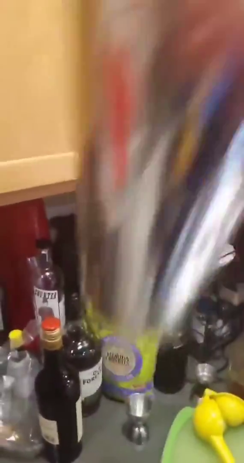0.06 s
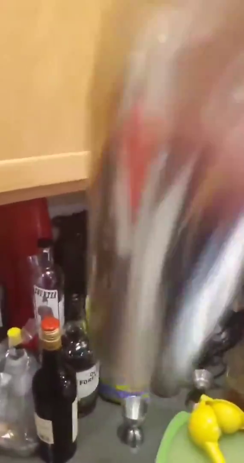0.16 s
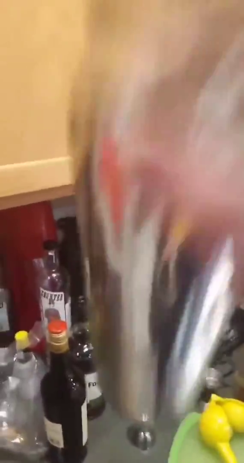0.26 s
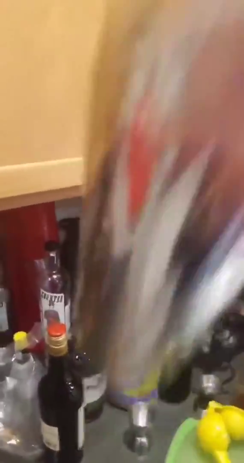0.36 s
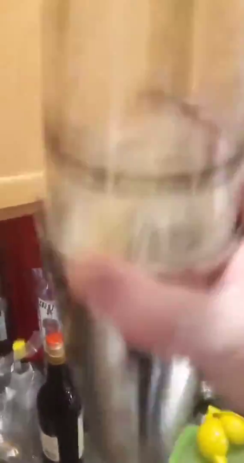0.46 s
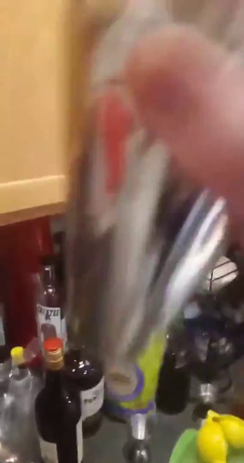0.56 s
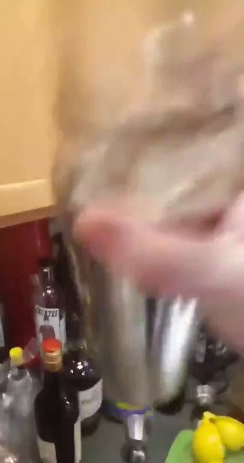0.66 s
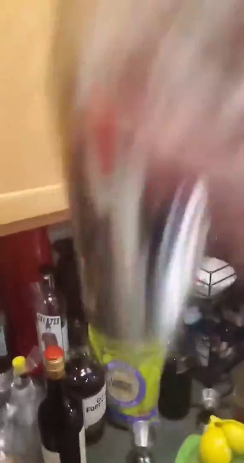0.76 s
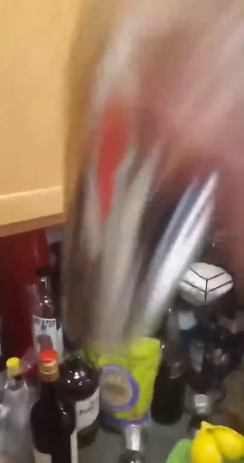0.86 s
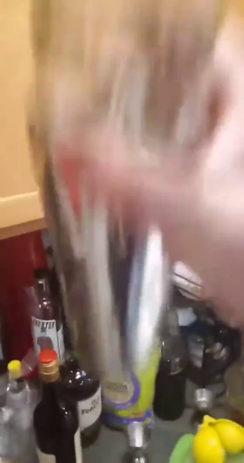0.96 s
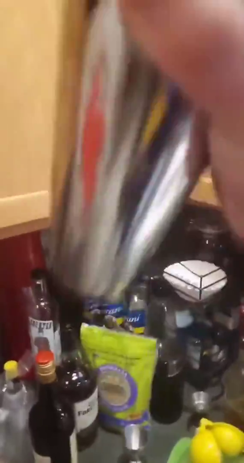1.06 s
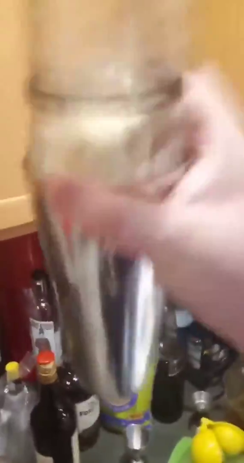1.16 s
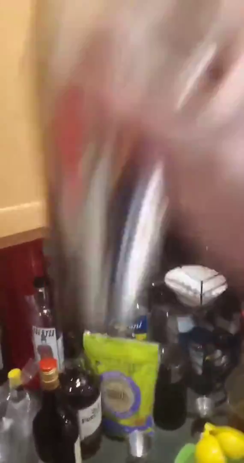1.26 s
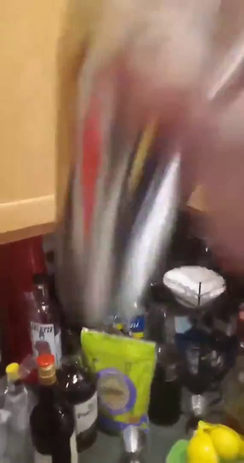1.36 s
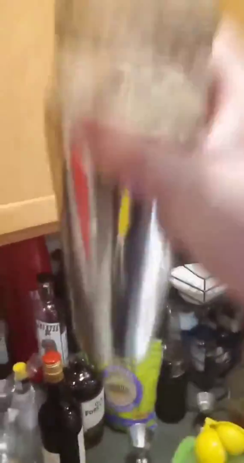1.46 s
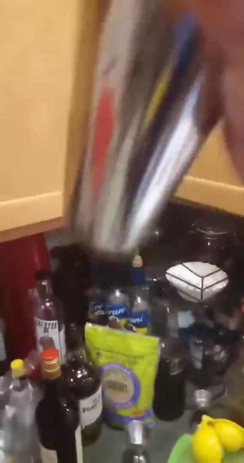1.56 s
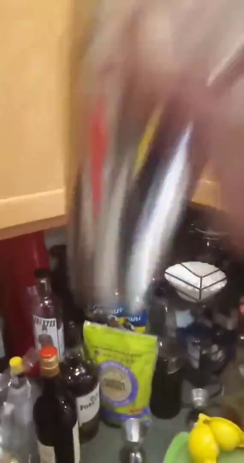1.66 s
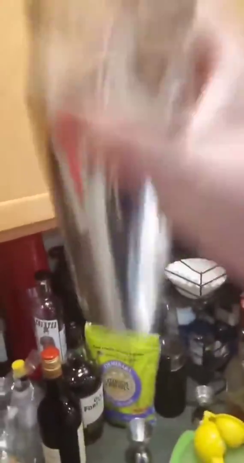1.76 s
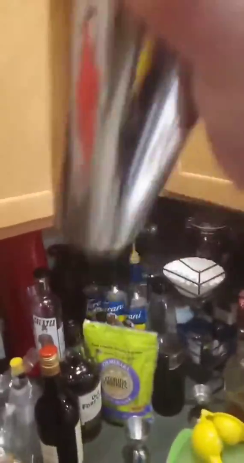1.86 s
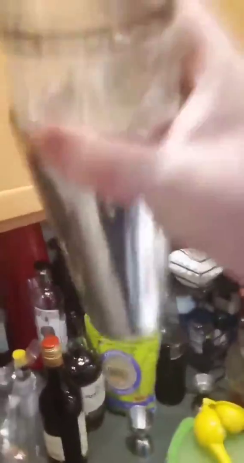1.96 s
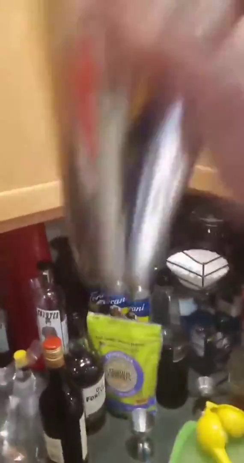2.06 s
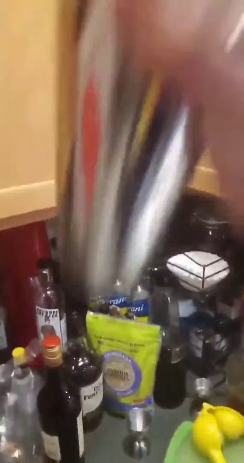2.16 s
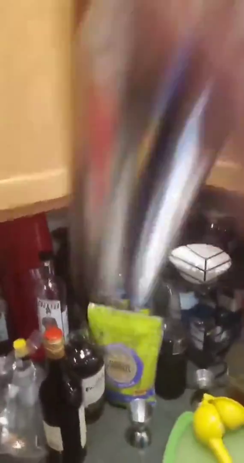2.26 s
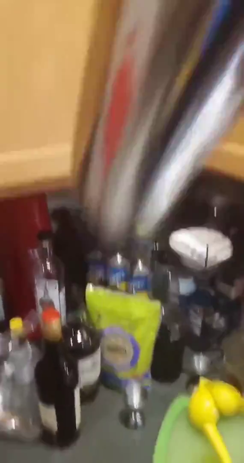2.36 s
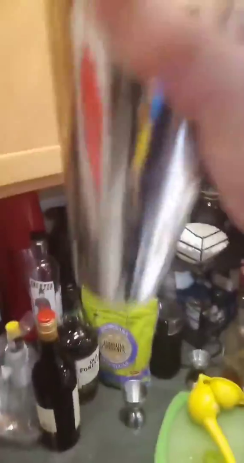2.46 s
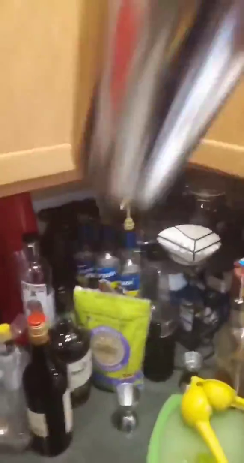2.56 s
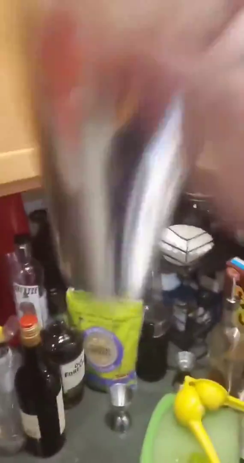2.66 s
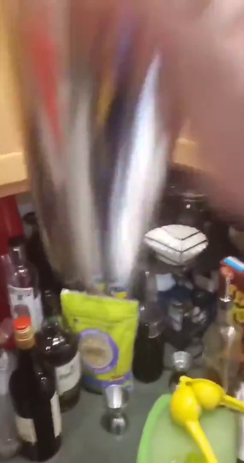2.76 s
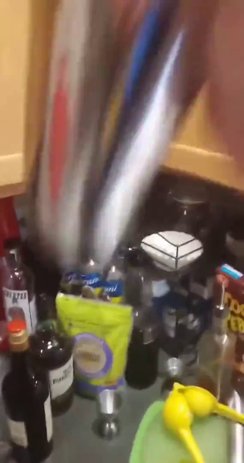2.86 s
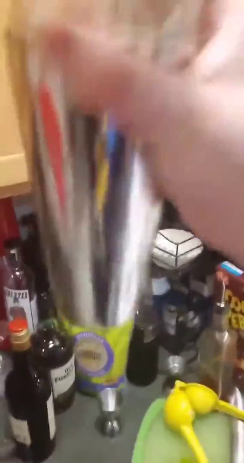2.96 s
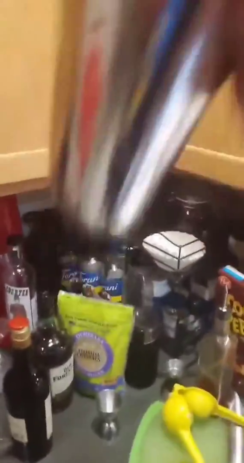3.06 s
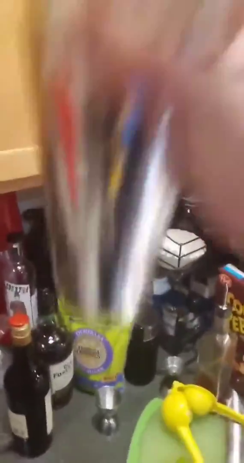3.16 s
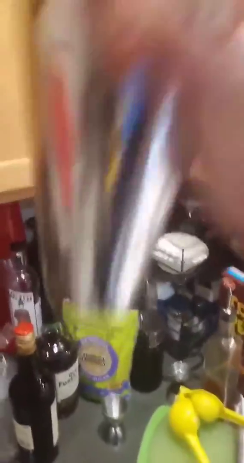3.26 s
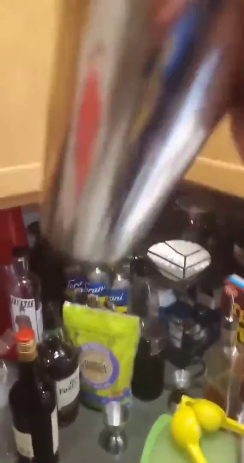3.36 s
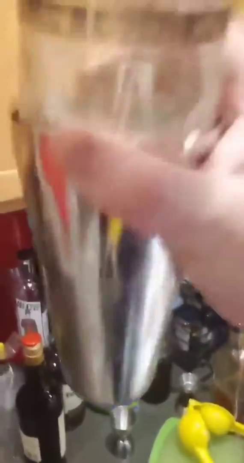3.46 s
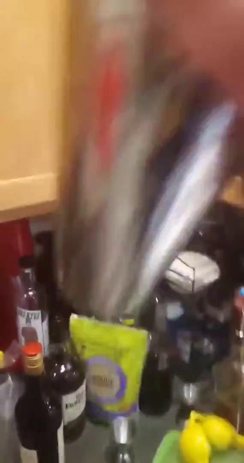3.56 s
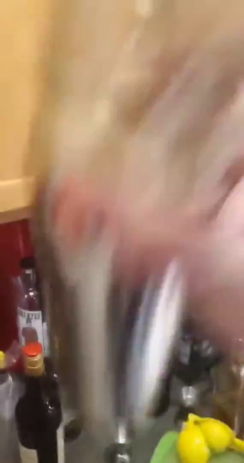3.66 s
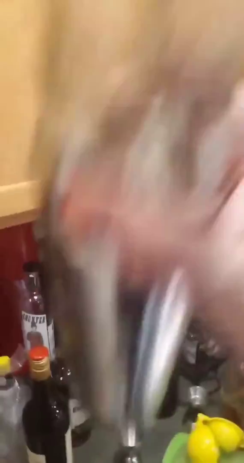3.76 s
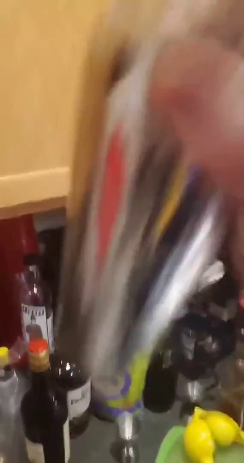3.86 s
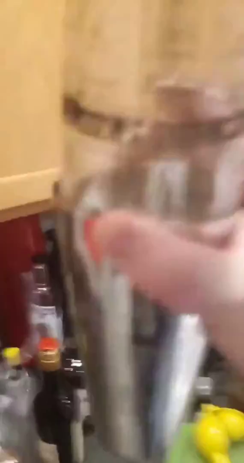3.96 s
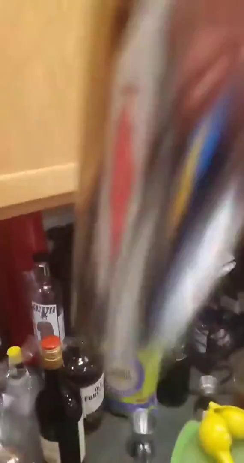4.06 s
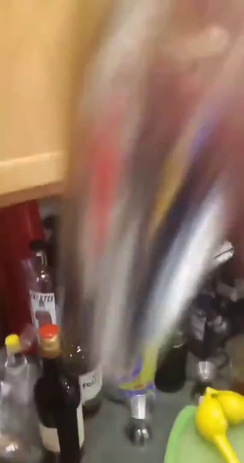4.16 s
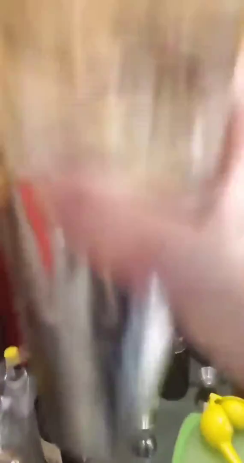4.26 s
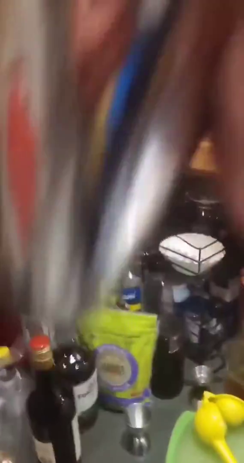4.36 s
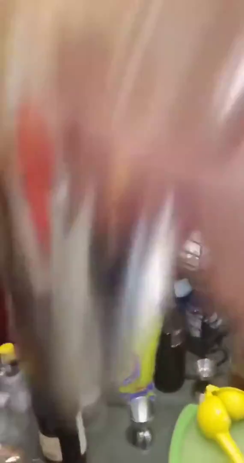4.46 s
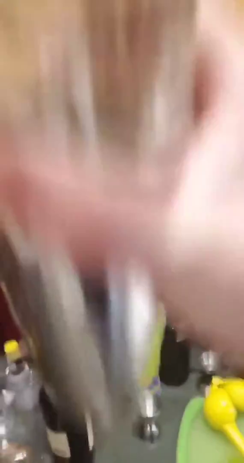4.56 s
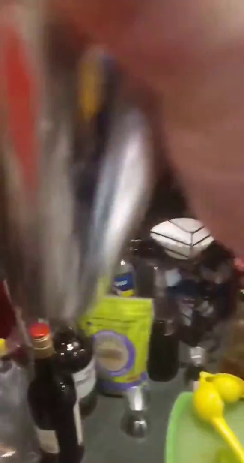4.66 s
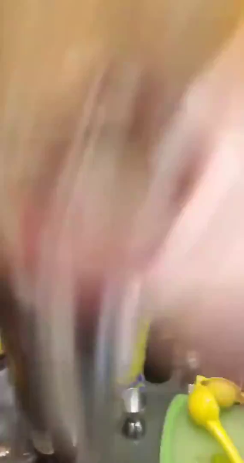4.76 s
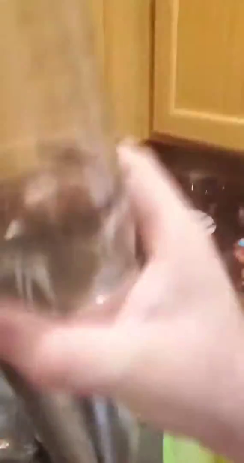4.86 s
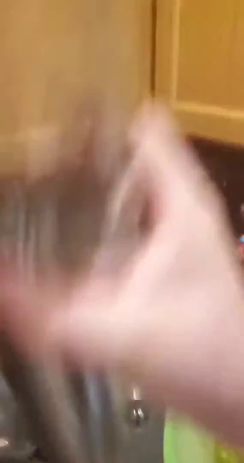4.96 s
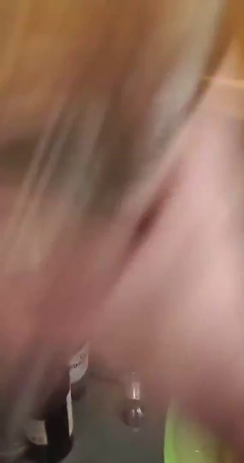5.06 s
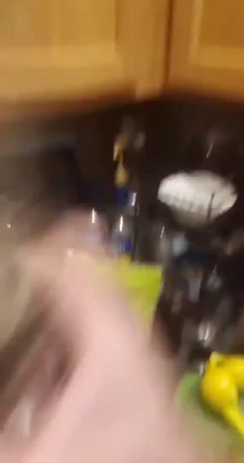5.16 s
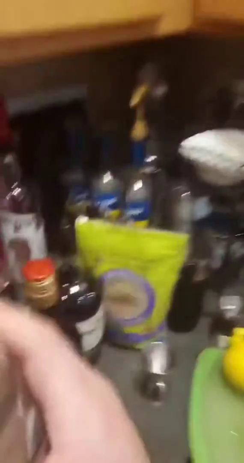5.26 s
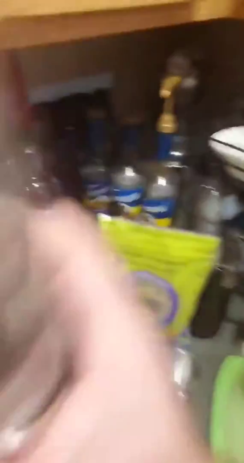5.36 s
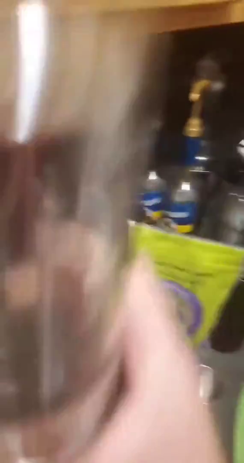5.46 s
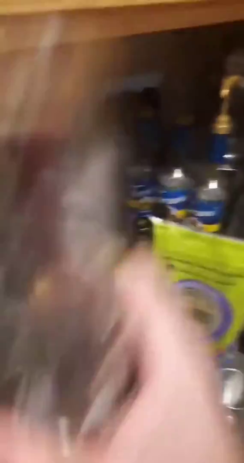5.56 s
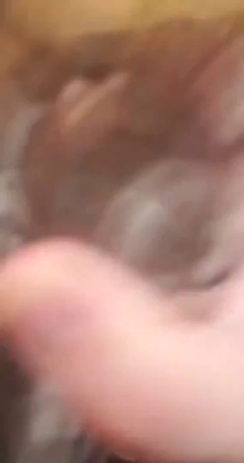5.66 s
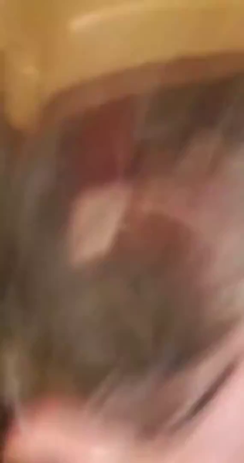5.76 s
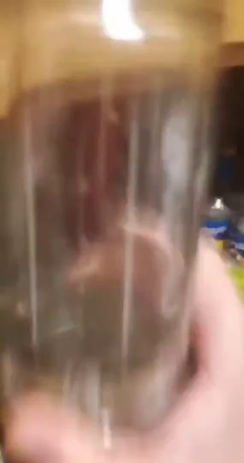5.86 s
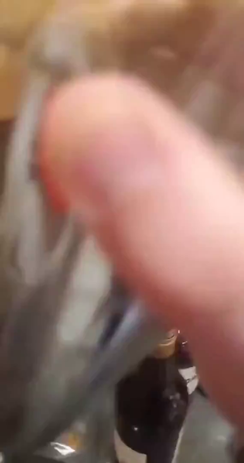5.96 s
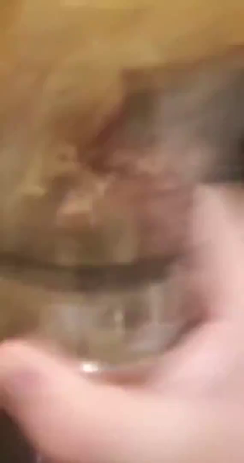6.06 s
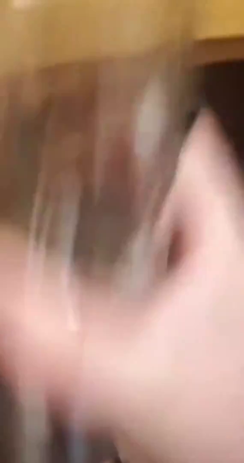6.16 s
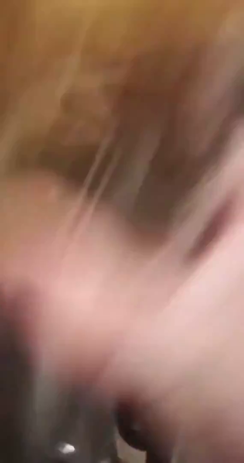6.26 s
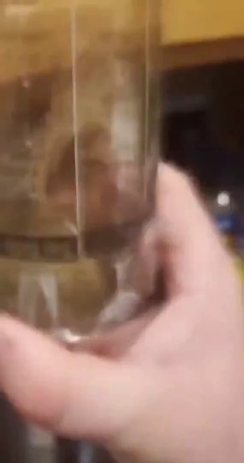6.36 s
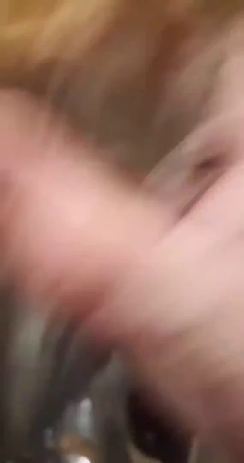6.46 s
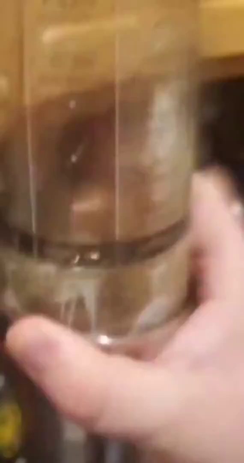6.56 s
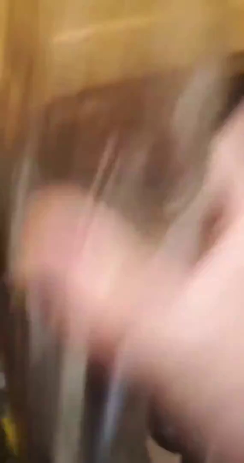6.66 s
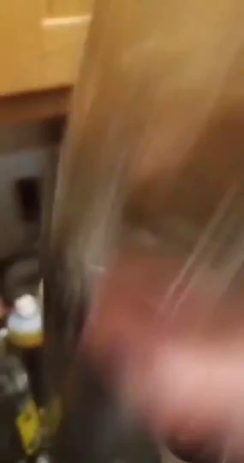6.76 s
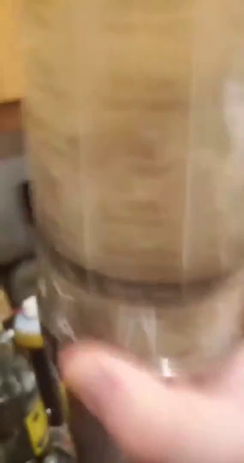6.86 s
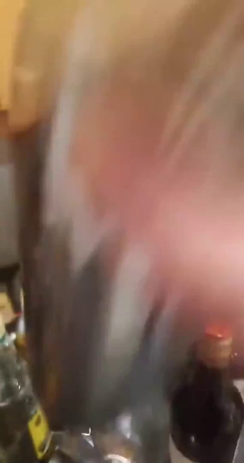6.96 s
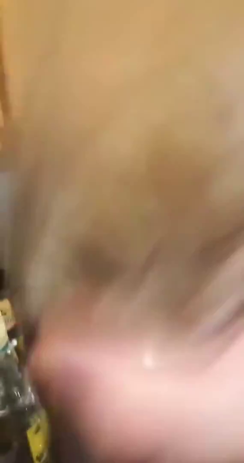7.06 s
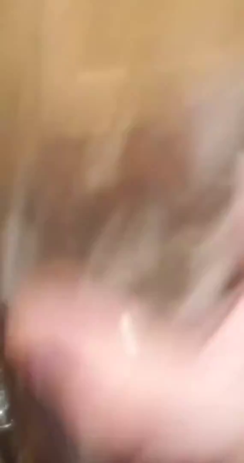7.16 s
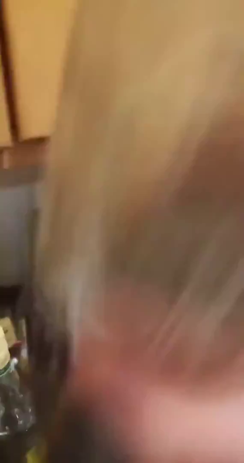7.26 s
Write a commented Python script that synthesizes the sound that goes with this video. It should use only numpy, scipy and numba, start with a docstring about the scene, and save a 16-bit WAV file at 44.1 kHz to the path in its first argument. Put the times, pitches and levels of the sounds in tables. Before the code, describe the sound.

Shaking is already under way at 0 s: ice and drink surge inside a steel tin capped with glass, held very close to a phone. Crashes come roughly every quarter second, each preceded by a short gritty slide and followed by a quickly fading trickle. Individual cubes strike between them with hard, dry clacks, mostly mid to high in pitch, some with a dull liquid thump. The gripped metal rings only briefly. Around 2.9 and 3.1 s the crashes are especially short and sharp. From about 4.9 to 5.7 s the surges weaken and spread apart, though single clacks continue; near 6 s the vigorous, even rhythm returns and lasts to the end at about 7.3 s. Tiny rising bubbles and brief wide hisses colour the rattle. The small kitchen adds a short tail over faint rumble and hum.

```python
"""Ice cubes clack singly against a steel tin capped with a glass, shaken hard close to a phone in a kitchen.
On each stroke the load of ice and drink slides, crashes into the end and trickles to rest.
Ice is sums of damped modes and filtered noise; the drink adds dull thumps and bubbles of rising pitch.
The gripped tin rings briefly, the small room adds a short tail, and a low rumble and hum lie beneath.
A wide hiss swells briefly whenever treble stands clear of the rattle."""
import sys
import numpy as np
from scipy import signal
from scipy.fft import rfft, irfft
from scipy.io import wavfile
from scipy.ndimage import uniform_filter1d
from numba import njit

SR = 44100
rng = np.random.default_rng(int(sys.argv[2]) if len(sys.argv) > 2 else 0)


def persist_wave(psi):
    """Save psi, clipped to +-1, as 16-bit WAV."""
    counts = np.round(np.clip(psi, -1, 1) * 32767).astype(np.int16)
    wavfile.write(sys.argv[1], SR, np.atleast_2d(counts).T)


N = 322371
T = np.arange(N) / SR
CONTROL_T = T[::32]  # coarser time grid for the slow levels

# Colour of a blow heard through the shaker wall. Each row: frequency in Hz, relative level in dB.
WALL_COLOUR = [(100, -14), (400, -11.5), (570, -11), (900, 0.5), (1500, 1.5), (1870, 7), (2350, 4),
               (4000, 1.5), (5500, -4.5), (7200, -5.5), (8200, -16.5), (10000, -12.5), (12000, -9.5),
               (13800, -17)]
# Colour of the load's dull push on the end. Each row: frequency in Hz, relative level in dB.
THUD_COLOUR = [(25, -32), (60, -2.5), (120, 2), (250, 1.5), (400, 8), (560, 1), (800, 8.5), (2500, -57)]
# Strokes of the arm. Each row: crash start in seconds, crash length in seconds, crash level in dB,
# length of the slide before it in seconds, slide level in dB, relative weight of the liquid in dB.
ARM_STROKES = [(0.148, 0.032, -19.5, 0.071, -30, -13.5), (0.398, 0.031, -18, .11, -34, -19),
               (0.612, 0.046, -20, 0.072, -33.5, -17), (0.842, 0.061, -19.5, 0.11, -32.5, -7.5),
               (1.108, 0.021, -19, 0.12, -31.5, -36), (1.338, 0.032, -19.5, 0.092, -28.5, -15),
               (1.607, 0.06, -21.5, 0.17, -33.5, -18), (1.872, 0.027, -19.5, .12, -31, -34),
               (2.11, 0.036, -17.5, 0.11, -36, -25), (2.357, 0.041, -20.5, 0.14, -33, -18.5),
               (2.608, 0.084, -19, 0.073, -30, -16), (2.884, 0.011, -14.5, 0.12, -32.5, -35),
               (3.143, 0.014, -16, 0.13, -28, -41), (3.345, 0.071, -23, 0.033, -25, -15.5),
               (3.603, 0.066, -20.5, 0.031, -26, -22.5), (3.875, 0.038, -19, 0.085, -31, -20),
               (4.098, .068, -20, 0.067, -32.5, -9), (4.407, 0.046, -17.5, 0.11, -36.5, -26),
               (4.682, 0.039, -20.5, 0.04, -51, -15), (4.99, 0.083, -31, 0.071, -30.5, -11),
               (5.372, .025, -26, 0.153, -32, -17.5), (5.665, 0.065, -27, 0.088, -37, -20),
               (5.975, 0.047, -19, 0.089, -36.5, -12.5), (6.241, 0.11, -21.5, .058, -33, -25),
               (6.505, 0.042, -18.5, 0.073, -31, -13.5), (6.77, 0.029, -18.5, .1, -31, -27),
               (7.012, 0.028, -18.5, 0.12, -30, -25), (7.25, 0.045, -19.5, 0.078, -30.5, -12.5)]


def undb(db):
    """Amplitude gain of a level in decibels."""
    return 10 ** (np.asarray(db) / 20)


def unit(x):
    """Normalisation to an rms of 1."""
    return x / np.sqrt(np.mean(x ** 2))


def on_log(points, hz):
    """Interpolation of (Hz, value) points on a logarithmic frequency axis."""
    f, value = np.transpose(points)
    return np.interp(np.log(np.maximum(hz, 1)), np.log(f), value)


def colour(x, points, size=2048):
    """Minimum-phase filtering to a (Hz, dB) outline: folding the cepstrum makes the response causal."""
    gain = undb(on_log(points, np.fft.rfftfreq(size, 1 / SR)))
    cepstrum = irfft(np.log(gain))
    cepstrum[1:size // 2] *= 2
    cepstrum[size // 2 + 1:] = 0
    response = irfft(np.exp(rfft(cepstrum)))
    return signal.fftconvolve(x, response)[:len(x)]


def fade(t, t60):
    """Exponential decay of a damped vibration, 60 dB down after t60 seconds."""
    return np.exp(-np.log(1000) * t / t60)


def loudness(x, seconds):
    """Running rms over a sliding window."""
    mean_square = uniform_filter1d(x ** 2, max(int(seconds * SR), 1))
    return np.sqrt(np.maximum(mean_square, 1e-14))


def add(out, s, x):
    """Superposition: x is mixed into out at time s in seconds."""
    i = int(np.clip(s * SR, 0, N - 1))
    out[i:i + len(x)] += x[:N - i]


@njit
def rings(start, hz, t60, size, glide, length):
    """Superposed damped sines, each a decaying complex rotation; the pitch rises by the fraction glide."""
    out = np.zeros(length)
    for k in range(len(start)):
        first, n = int(start[k] * SR), int(t60[k] * SR) + 1
        turn = 2j * np.pi * hz[k] / SR
        pole = np.exp(turn - np.log(1000) / n)
        bend = np.exp(turn * glide / n)
        z = size[k] + 0j
        for i in range(first, min(first + n, length)):
            z *= pole
            pole *= bend
            out[i] += z.imag
    return out


def while_moving(x, response, size=4096):
    """Time-varying convolution: the response is drawn anew for each overlapping window as the shaker travels."""
    out = np.zeros(N)
    window = np.sin(np.pi * np.arange(size) / size)
    for i in range(0, N, size // 2):
        piece = x[i:i + size]
        add(out, i / SR, signal.fftconvolve(piece * window[:len(piece)], response()))
    return out


def background(floor_db=-50.5, hum_db=-59, hum_hz=60):
    """Stationary ambient noise: filtered random rumble plus a mains hum as a pure tone."""
    # Quiet room. Each row: frequency in Hz, relative level in dB per Hz.
    floor_colour = [(22, -34), (33, -4), (46, 12), (75, 6.5), (150, -2), (400, -3.5), (1000, -11),
                    (4000, -38), (14000, -28)]
    rumble = unit(colour(rng.standard_normal(N), floor_colour, size=8192))
    hum = np.sqrt(2) * np.sin(2 * np.pi * hum_hz * T)
    return undb(floor_db) * rumble + undb(hum_db) * hum


def kitchen(x, wet_db=-9.5, build_s=0.0014):
    """Diffuse reverberation off counter and cupboards: decaying noise in bands, the bass lasting longest."""
    # Reverberation. Each row: frequency in Hz, t60 in seconds.
    decay_times = [(200, 0.33), (1400, 0.1), (4000, 0.15), (11000, 0.14)]
    t, f = T[:SR // 3], np.fft.rfftfreq(2 * SR, 1 / SR)
    edges = np.array([0, 300, 700, 1500, 3000, 6000, 10000, 20000])  # Hz
    noise = rfft(rng.standard_normal(2 * SR))
    bands = np.array([irfft(noise * ((f >= lo) & (f < hi))) for lo, hi in zip(edges, edges[1:])])
    t60 = on_log(decay_times, (edges[1:] + edges[:-1]) / 2)
    build_up = 1 - np.exp(-(t / build_s) ** 2)
    decay = fade(t, t60[:, None]) * build_up

    def echoes():
        """Reflection pattern at one place, of unit energy."""
        i = rng.integers(SR)
        tail = np.sum(bands[:, i:i + len(t)] * decay, axis=0)
        return tail / np.linalg.norm(tail)
    return undb(wet_db) * while_moving(x, echoes)


def tin(detune=0.033):
    """Modal impulse response of the hand-damped wall; drink washing over the steel shifts the pitches."""
    # Ringing of the shaker. Each row: frequency in Hz before detuning, relative level in dB, t60 in seconds.
    wall_modes = [(399.6, -10, 0.1), (928, -2, 0.04), (1247, 2.5, 0.0067), (1750, -51, 0.032),
                  (1978, 1.5, 0.046), (2430, -2.5, 0.056), (2785, -6, 0.0061), (3630, 4.5, 0.038),
                  (4575, 0, 0.06)]
    t = T[:SR // 8]
    shifts = rng.standard_normal(len(wall_modes))
    phases = rng.uniform(0, 2 * np.pi, len(wall_modes))
    response = np.zeros(len(t))
    for (hz, db, t60), shift, phase in zip(wall_modes, shifts, phases):
        tone = np.sin(2 * np.pi * hz * (1 + detune * shift) * t + phase)
        response += undb(db) * tone * fade(t, t60)
    return response


def wide_hiss(hits, mass, side_db=-2, side_hz=4800):
    """Stereo treble noise: a wide hiss swells briefly whenever treble stands clear of the rattle."""
    treble = signal.ellip(8, .5, 80, side_hz, "high", fs=SR, output="sos")
    edge, rattle = (loudness(signal.sosfilt(treble, x), 0.029) for x in (hits, mass))
    hiss = unit(signal.sosfilt(treble, colour(rng.standard_normal(N), WALL_COLOUR)))
    clearness = edge ** 2 / (edge ** 2 + (3 * rattle) ** 2)  # near 1 well above the rattle
    return undb(side_db) * hiss * edge * clearness


def bubbles(count=700, middle_hz=1500, octaves=0.565, cycles=16, spread_db=4):
    """Bubble resonance: air folded into the drink rings in short rising notes."""
    hz = np.clip(middle_hz * 2 ** (octaves * rng.standard_normal(count)), 700, 8000)
    size = undb(spread_db * np.minimum(rng.exponential(size=count), 3))
    start = rng.uniform(0, N / SR, count)
    return unit(rings(start, hz, cycles / hz, size, 0.044, N))


def tumble(count=8000, order=5, spread_db=4.5, ice_t60=0.0098, damping=0.43, even_s=0.016,
           slush_db=-6, slush_s=0.0066, tick_db=-5):
    """Random impacts exciting modes: each fragment rings briefly, crushes slush and nudges the end."""
    when = np.sort(rng.uniform(0, N / SR, count))
    size = undb(spread_db * np.minimum(rng.exponential(size=count), 4))
    hz = rng.uniform(400, 14500, (count, order))
    t60 = ice_t60 * (3000 / hz) ** damping  # high modes die sooner; ice_t60 holds at 3000 Hz
    sizes = size[:, None] * rng.standard_normal(hz.shape) / np.sqrt(t60)
    fragments = rings(np.repeat(when, order), hz.ravel(), t60.ravel(), sizes.ravel(), 0., N)
    pushes = np.bincount((when * SR).astype(int), size * rng.choice([-1, 1], count), N)
    slush = loudness(pushes, slush_s) * rng.standard_normal(N)
    contacts = unit(fragments) + undb(tick_db) * unit(pushes) + undb(slush_db) * unit(slush)
    ice = colour(contacts, WALL_COLOUR)
    thud = colour(pushes * np.abs(pushes), THUD_COLOUR)  # the heavy pieces push hardest
    # both are evened out here; the strokes shape the loudness later
    return ice / loudness(ice, even_s), thud / loudness(thud, 2 * even_s)


def swell(start, length, rise_db_per_s, fall_db_per_s):
    """Exponential attack, hold and release: full level from start for length seconds."""
    before = np.maximum(start - CONTROL_T, 0)
    after = np.maximum(CONTROL_T - start - length, 0)
    return undb(-rise_db_per_s * before - fall_db_per_s * after)


def agitation(rest_db=-53.5, slip_rate=1800, gather_rate=604, settle_rate=401,
              trickle_db=-15, trickle_rate=120):
    """Summed powers give the load's level in dB: it slides along the wall, crashes and trickles to rest."""
    # rates in dB per second; rest_db is ice shifting while the arm turns round
    power = undb(rest_db) ** 2
    for s, length, crash_db, slide_s, slide_db, _ in ARM_STROKES:
        slide = undb(slide_db) * swell(s - slide_s, slide_s, slip_rate, settle_rate)
        crash = undb(crash_db) * swell(s, length, gather_rate, settle_rate)
        trickle = undb(crash_db + trickle_db) * swell(s, length, slip_rate, trickle_rate)
        power = power + slide ** 2 + crash ** 2 + trickle ** 2
    return 10 * np.log10(power)


def load(ice_db=-1, thud_db=-1, bubble_db=-12, slosh_db=-54, harden=0.096, crisp_hz=6000, rattle_db=-19):
    """Amplitude modulation by the strokes: ice and drink surge; a few bubbles carry on between."""
    level_db = np.interp(T, CONTROL_T, agitation())
    weight_db = np.interp(T, [row[0] for row in ARM_STROKES], [row[-1] for row in ARM_STROKES])
    ice, thud = tumble()
    high_pass = signal.butter(2, crisp_hz, "high", fs=SR, output="sos")
    crisp = signal.sosfiltfilt(high_pass, ice)
    # faster contacts are shorter, so brighter: harden is treble dB per dB of level above rattle_db
    ice = ice + crisp * (undb(harden * (level_db - rattle_db)) - 1)
    mixture = undb(ice_db) * ice + undb(weight_db + thud_db) * thud + undb(bubble_db) * bubbles()
    slosh = bubbles(count=170, cycles=14, spread_db=6.5)
    return undb(level_db) * mixture + undb(slosh_db) * slosh


def clacks(order=9, crack_t60=0.045, snap_db=3, snap_t60=0.0045, crumb_t60=0.06, crumb_db=-17,
           ring_t60=0.024, octaves=.18, ring_db=-1, thud_t60=0.017, thud_db=-2.0, gain_db=1.5,
           crush_s=.0009, bright_db=1.12, scatter_db=1):
    """Impact excitation: a cube cracks with trailing crumbs, rings in short modes and dully pushes the wall."""
    # Single cubes striking the wall. Each row: start in seconds, peak level in dB before gain_db,
    # centre of the ring pitches in Hz, relative thud level in dB before thud_db.
    cube_strikes = [(0.061, -27.5, 3800, -15), (0.073, -23.5, 1990, 4), (0.207, -23.5, 4600, -23),
                    (0.269, -32.5, 2720, -23), (0.287, -17, 4490, -9.5), (0.308, -17.5, 5030, -6),
                    (0.358, -20, 950, -12), (0.454, -20.5, 4640, -22), (0.503, -25, 2320, -20),
                    (0.527, -12.5, 1920, -11.5), (0.613, -12, 2054, -8), (0.654, -12, 2400, -25),
                    (0.762, -20.5, 2050, -3), (0.817, -18, 1870, 2), (0.845, -17, 1080, -6.5),
                    (1.004, -14.5, 2600, -10), (1.071, -15.5, 1270, -10.5), (1.27, -16.5, 2180, -8.5),
                    (1.308, -26, 2050, -10), (1.412, -12.5, 3220, -31), (1.476, -27, 980, -7),
                    (1.51, -24.5, 2340, -24), (1.563, -21.5, 1020, -6), (1.646, -14, 2200, -10.5),
                    (1.749, -18.5, 2450, -21), (1.79, -17, 2720, -33), (1.815, -18, 1910, -25),
                    (1.826, -16.5, 1730, -34), (2.005, -20.5, 2550, -13), (2.037, -17.5, 2020, -6.5),
                    (2.077, -21.5, 1020, -8), (2.254, -17.5, 3110, -19), (2.296, -14, 1450, -6),
                    (2.522, -16, 3210, -9.5), (2.565, -17.5, 2590, 0), (2.592, -16.5, 1140, -4),
                    (2.774, -16, 5450, -20), (2.799, -19, 4460, -7), (2.844, -19.5, 2380, -6.5),
                    (2.927, -23, 1050, -2.5), (3.012, -29, 5800, -8), (3.046, -18, 5380, -29),
                    (3.129, -18.5, 3400, -13), (3.263, -31, 2310, -20), (3.279, -28.5, 7300, -10),
                    (3.316, -21.5, 7100, -10), (3.337, -20, 2420, 0.5), (3.53, -18, 3470, -39),
                    (3.567, -16, 1920, -13), (3.696, -26.5, 2340, -13), (3.767, -25, 3140, -30),
                    (3.815, -16.5, 2550, -33), (3.84, -12, 1470, -1.5), (3.901, -16, 1970, -5),
                    (4.002, -28, 910, 9), (4.03, -19.5, 4250, -7.5), (4.174, -18.5, 2080, -17),
                    (4.317, -18.5, 2120, -14), (4.342, -19.5, 3510, -31), (4.387, -19, 1920, -30),
                    (4.407, -20.5, 1780, 6), (4.438, -21, 1880, -2), (4.54, -25.5, 3260, -5),
                    (4.574, -28.5, 2620, 1.5), (4.628, -29, 5100, -19), (4.642, -21, 4630, -37),
                    (4.679, -13, 1970, -11.5), (4.744, -22, 1880, -19), (4.842, -34, 2170, -1),
                    (4.913, -23.5, 940, -2), (4.962, -18, 1680, -27), (5.016, -17.5, 2470, -25),
                    (5.081, -20, 963, -29), (5.231, -23, 4200, -26), (5.27, -19, 3120, -27),
                    (5.294, -19.5, 4480, -5), (5.362, -16, 3870, -3), (5.551, -39.5, 2100, -15),
                    (5.587, -29, 1490, 2), (5.63, -20, 7220, -19), (5.689, -17.5, 2830, -12),
                    (5.808, -25.5, 2150, -28), (5.902, -15.5, 2675, -20), (5.963, -14, 1180, -13),
                    (6.025, -12.5, 3440, -27), (6.179, -16.5, 2144, -37), (6.226, -15, 3290, -4),
                    (6.28, -13.5, 2050, -36), (6.347, -20, 2110, -2), (6.454, -22.5, 3950, -5),
                    (6.507, -12.5, 1780, -34), (6.637, -23.5, 2230, -22), (6.665, -21, 5050, -23),
                    (6.684, -15.5, 6480, -37), (6.765, -16, 3760, -4), (6.782, -15.5, 2880, -13),
                    (6.867, -21.5, 5000, -16), (6.935, -22, 3200, -14), (7.008, -13.5, 2560, -33),
                    (7.038, -17, 3850, -3), (7.118, -24, 880, 0.5), (7.175, -21, 2060, -29)]
    out, t = np.zeros(N), T[:SR // 10]

    def peak(x):
        """Normalisation of the loudest 2 ms to an rms of 1."""
        return x / loudness(x, .002).max()

    contact = 1 - np.exp(-(t / crush_s) ** 2)  # a wet corner gives way before the cube stops
    snap = undb(snap_db) * fade(t, snap_t60)
    crumbs = undb(crumb_db) * fade(t, crumb_t60)
    breaking = contact * (snap + fade(t, crack_t60) + crumbs)
    for s, db, hz, weight_db in cube_strikes:
        crunch, push = rng.standard_normal((2, len(t)))
        detune, size = rng.standard_normal((2, order))
        modes = np.clip(hz * 2 ** (octaves * detune), 300, 13000)
        starts = rng.uniform(0, crush_s, order)
        cube = rings(starts, modes, np.full(order, ring_t60), size, 0., len(t))
        # spectral tilt in dB an octave: small hard cubes crack brighter
        tilt = bright_db * np.log2(hz / 2600) + scatter_db * rng.standard_normal()
        crack = colour(crunch * breaking, [(f, d + tilt * np.log2(f)) for f, d in WALL_COLOUR])
        thud = colour(push * contact * fade(t, thud_t60), THUD_COLOUR)
        ring = undb(ring_db) * peak(cube * contact)
        blow = peak(crack) + ring + undb(weight_db + thud_db) * peak(thud)
        add(out, s - crush_s / 2, undb(db + gain_db) * peak(blow))
    return out


def scene(tin_db=-44):
    """Superposition of sources: the shaker is dead centre, close, with the kitchen around it."""
    hits, mass = clacks(), load()
    direct = hits + mass
    shaker = direct + undb(tin_db) * while_moving(direct, tin)
    centre = shaker + kitchen(shaker) + background()
    opposite = np.array([[1], [-1]])  # opposite signs left and right sound wide
    return centre + opposite * wide_hiss(hits, mass)


def record(dry, ceiling=0.63, shelf_hz=13950, leak_db=-22, top_hz=15700):
    """Filtering and saturation: deep rumble is dropped, peaks are rounded, the top is dulled and then ends."""
    dry = signal.sosfilt(signal.butter(3, 30, "high", fs=SR, output="sos"), dry)
    dry = ceiling * np.tanh(dry / ceiling)
    # the top is dulled above shelf_hz and ends at top_hz
    below_shelf = signal.ellip(8, .2, 70, shelf_hz, fs=SR, output="sos")
    dry = signal.sosfilt(below_shelf, dry) + undb(leak_db) * dry
    return signal.sosfilt(signal.ellip(10, .2, 70, top_hz, fs=SR, output="sos"), dry)


dry = scene()
out = record(dry)
persist_wave(out)
```